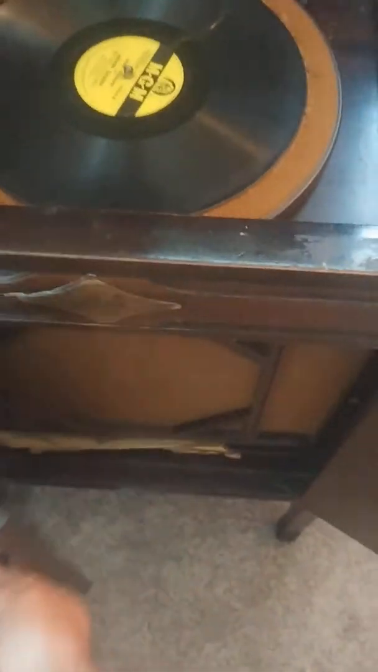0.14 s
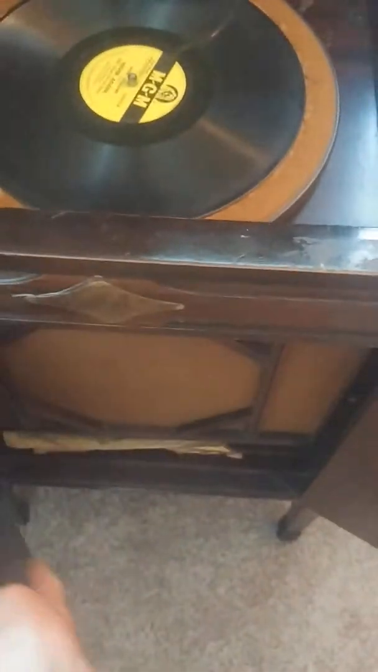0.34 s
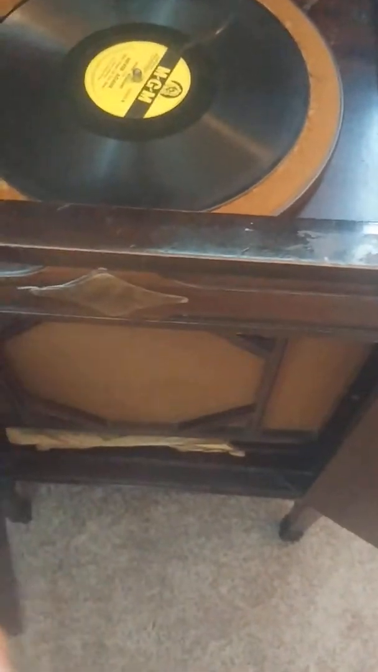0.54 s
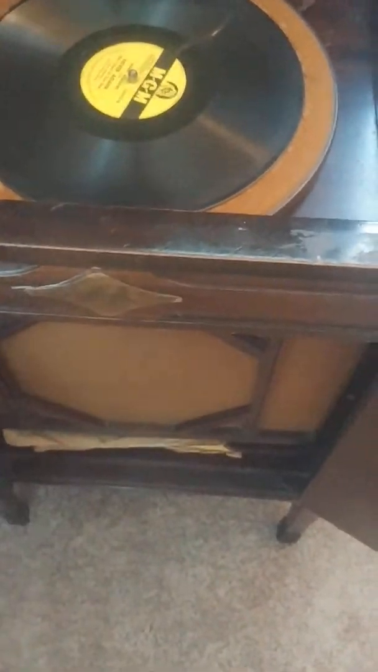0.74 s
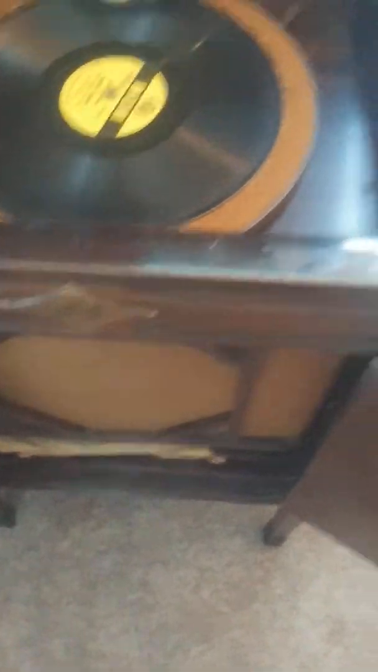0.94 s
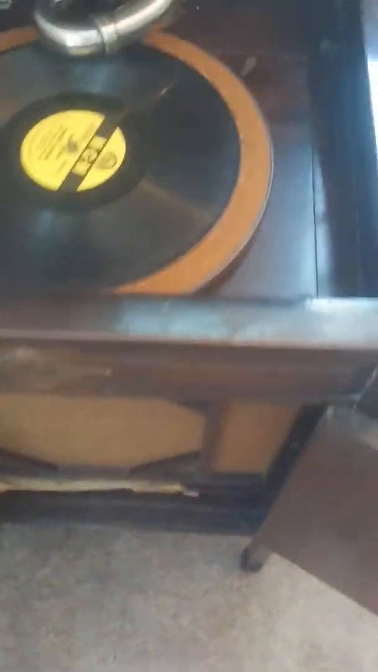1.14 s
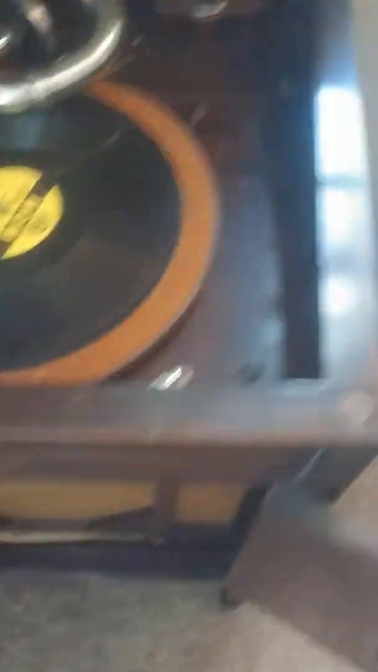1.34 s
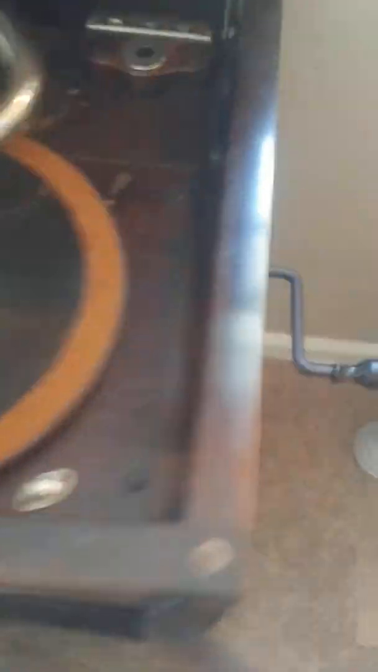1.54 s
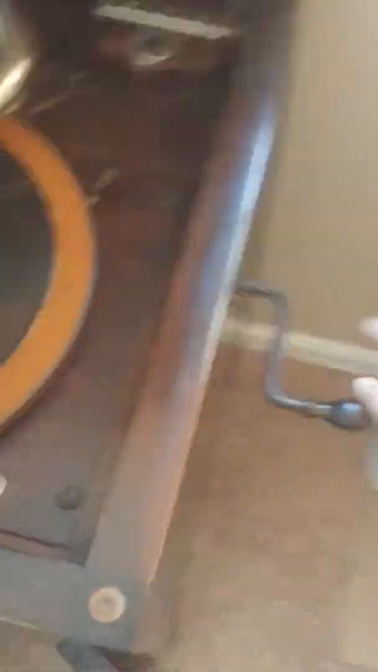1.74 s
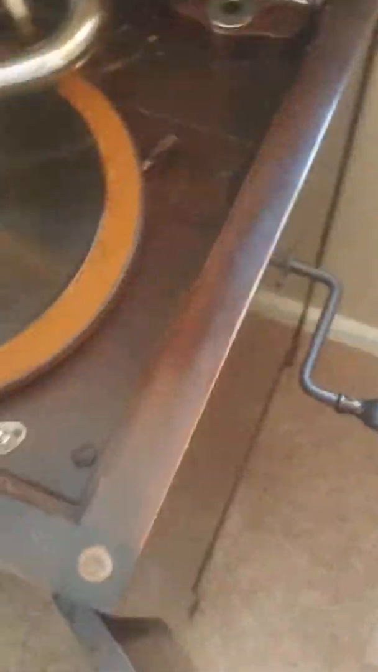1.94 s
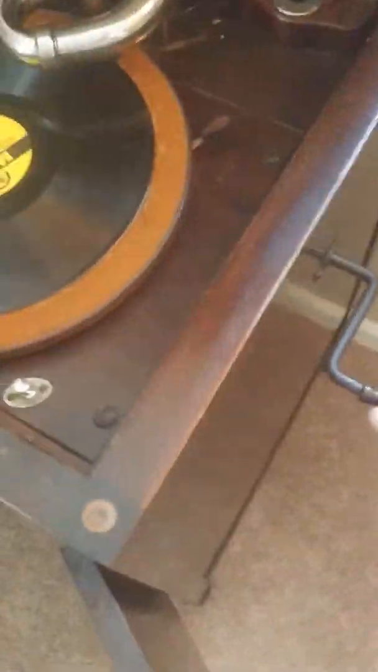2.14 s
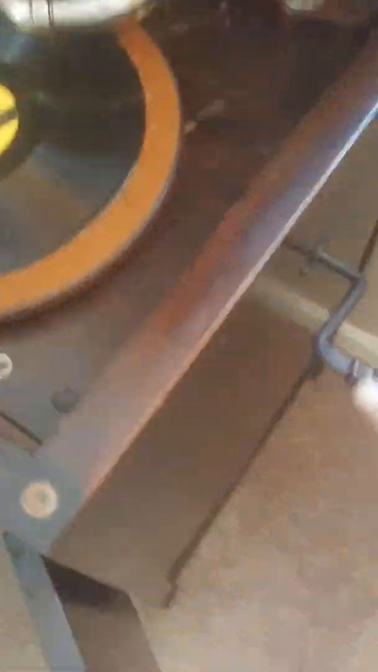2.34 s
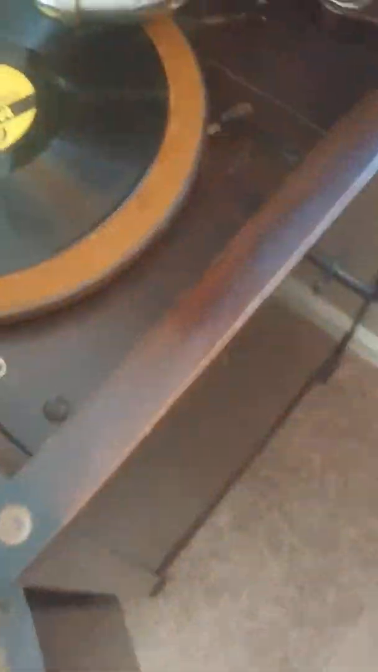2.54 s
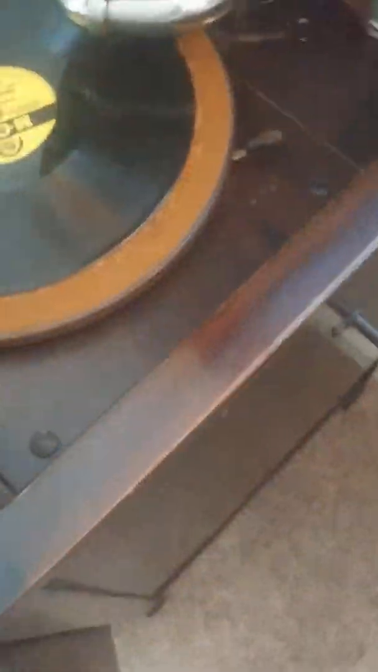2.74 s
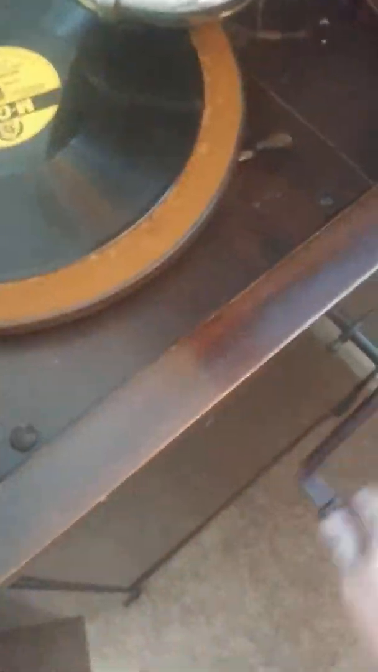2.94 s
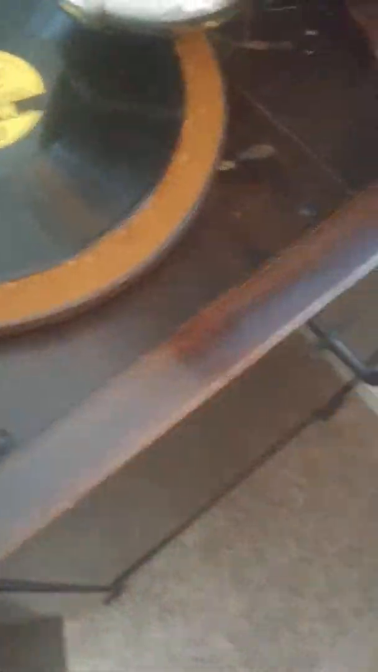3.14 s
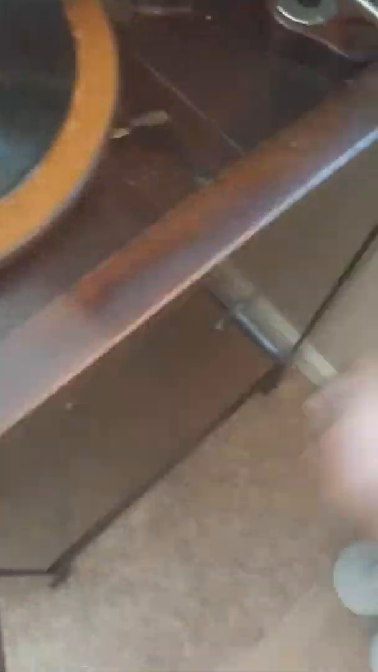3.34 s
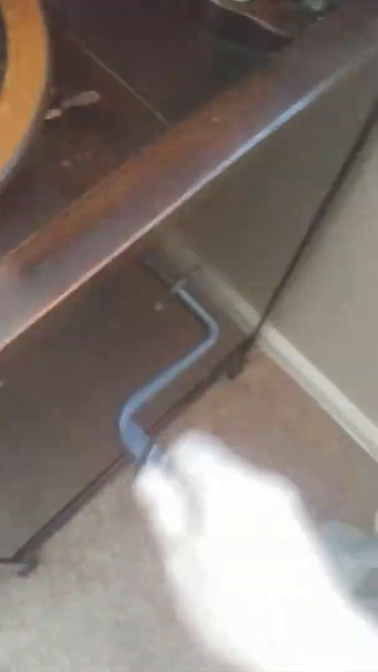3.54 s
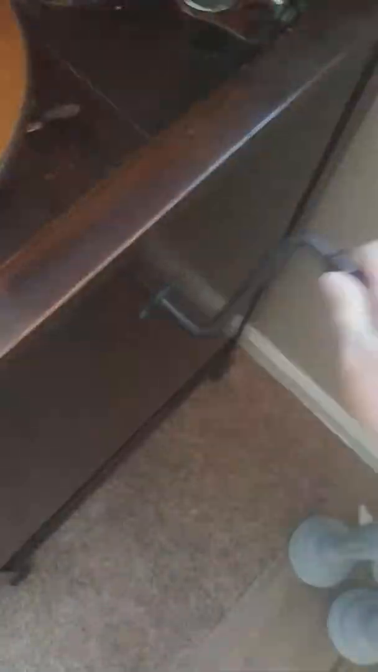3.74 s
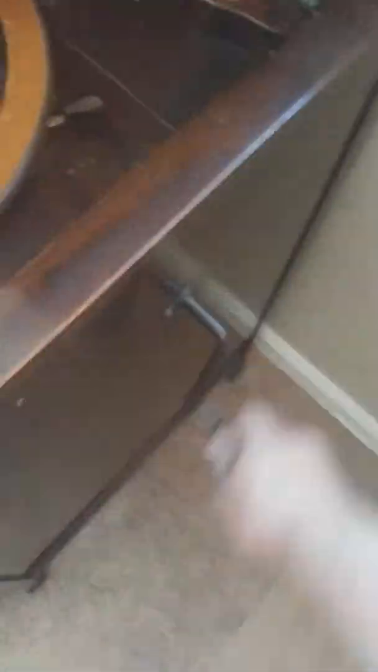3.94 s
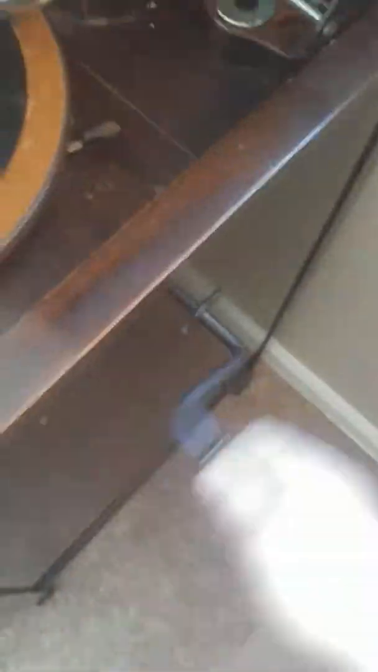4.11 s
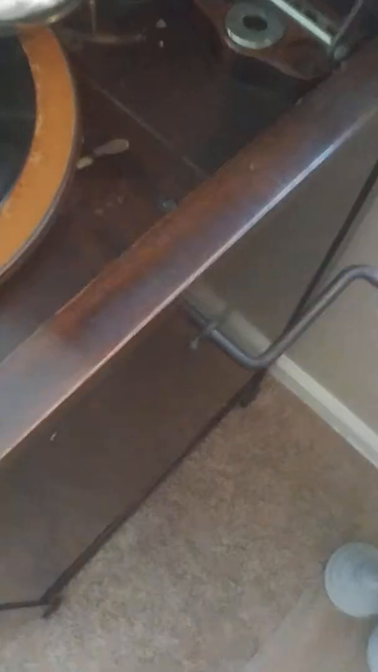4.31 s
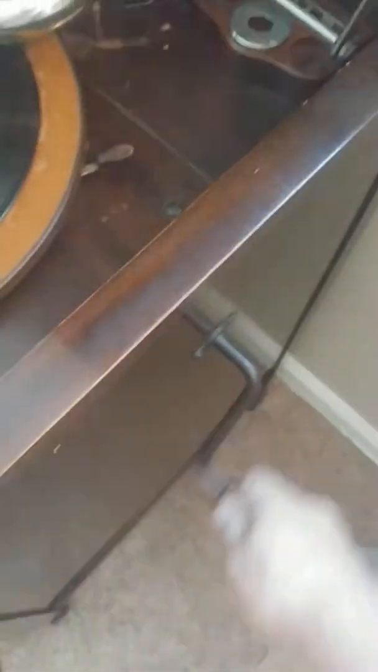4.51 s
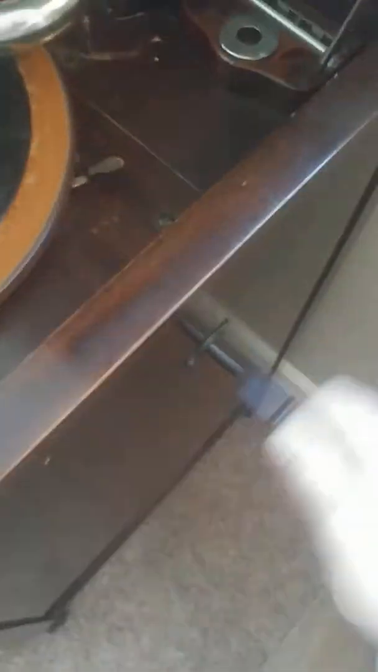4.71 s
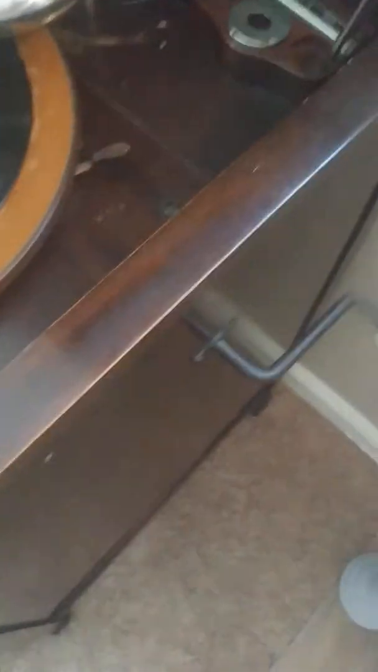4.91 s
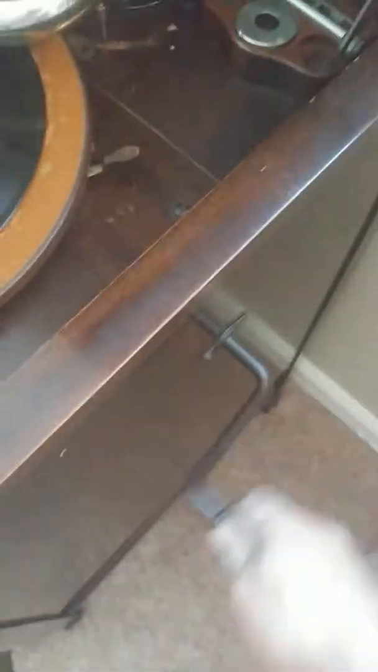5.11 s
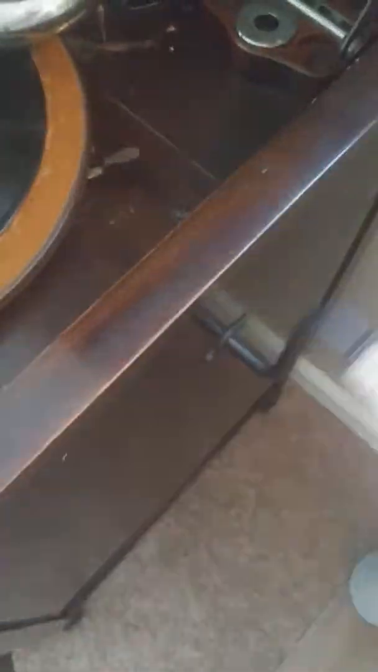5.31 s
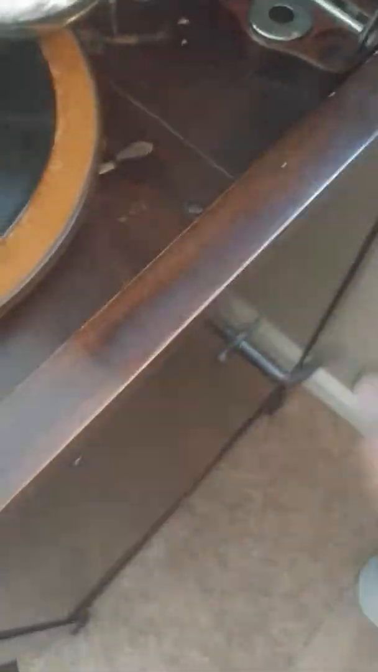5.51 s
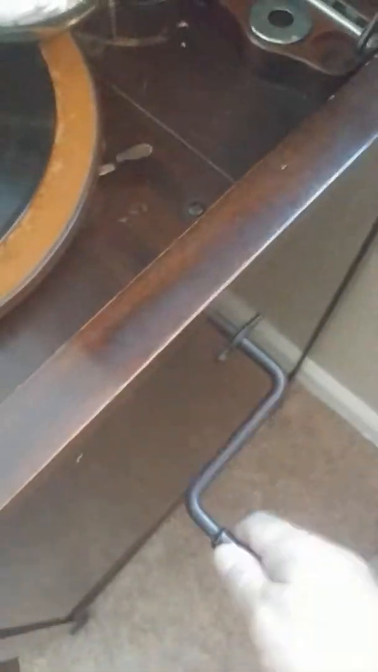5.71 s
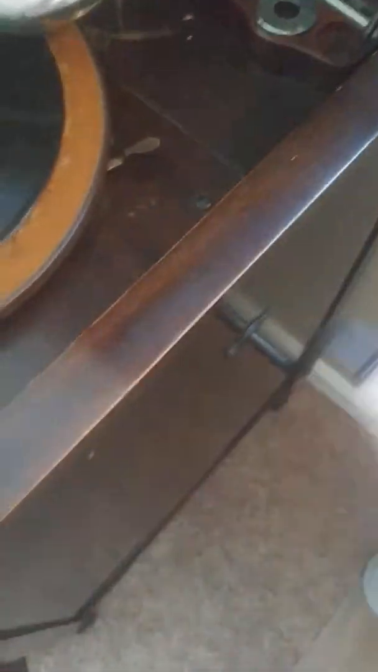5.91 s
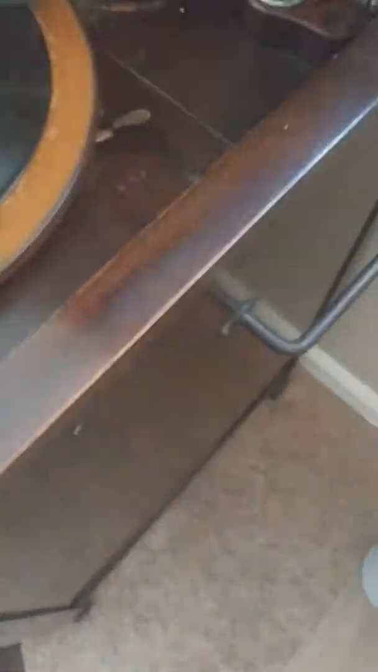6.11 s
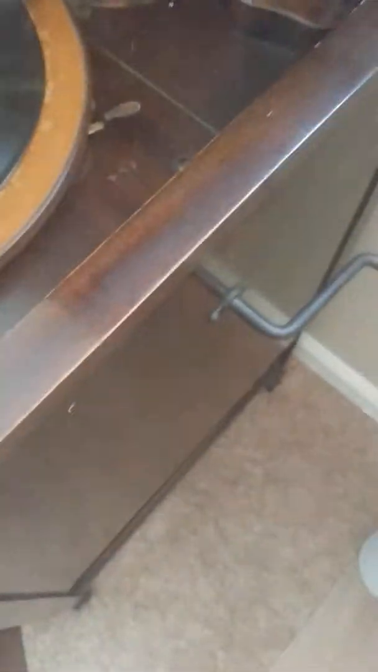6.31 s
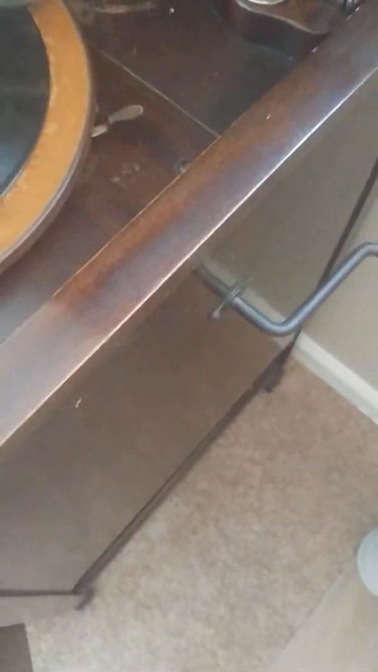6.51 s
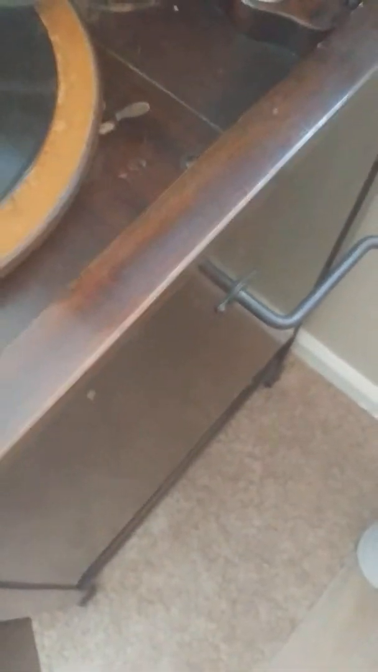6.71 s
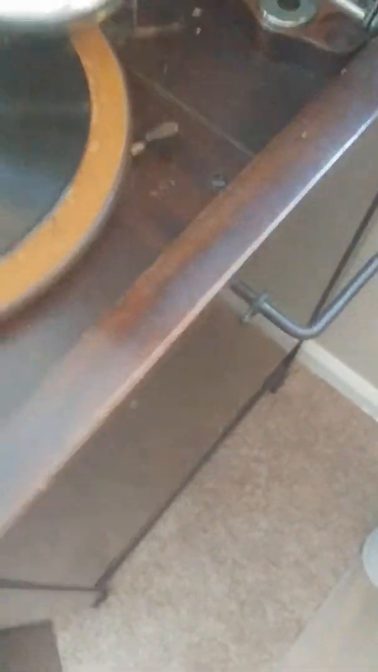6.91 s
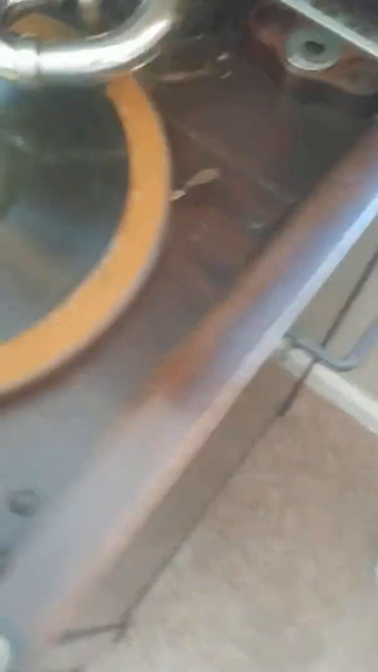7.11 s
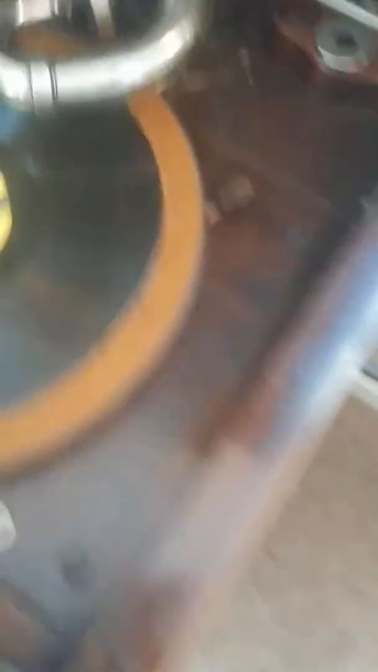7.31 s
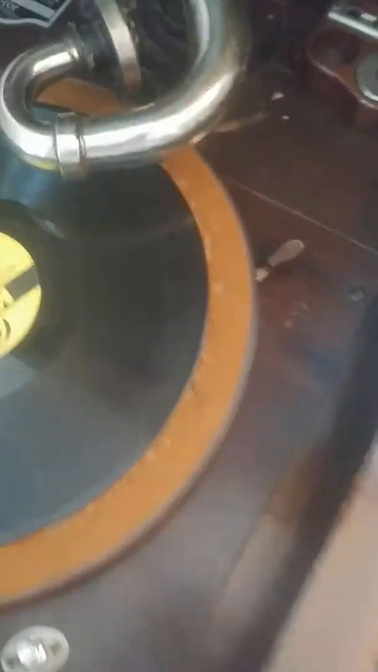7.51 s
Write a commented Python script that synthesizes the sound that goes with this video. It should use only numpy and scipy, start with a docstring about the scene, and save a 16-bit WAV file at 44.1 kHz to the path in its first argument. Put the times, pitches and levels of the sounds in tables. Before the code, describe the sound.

A carpeted room with short, soft reverberation, heard closely in stereo over faint air and a wavering low hum. At 0 s a wooden cabinet door shuts with a dull clap and rattle, leaving a thin metallic ring; a small latch click follows near 0.37 s, with a faint moan. Light cloth brushes and small taps occur around 1.0 to 1.4 s. From 1.8 s a loose crank ticks and rattles, then knocks hard at 2.06 and, loudest, 2.13 s. Winding begins about 2.5 s and runs to 6.1 s: rough, hollow gear grinding with tiny ratchet ticks, a low throb swelling about every 0.55 s, and wooden thuds and metallic clicks marking the turns. Short squeaks chirp at 4.1, 4.9, 5.4 and 6.0 s. The grinding stops; soft bumps at 6.3 to 6.6 s and a small ringing tick at 6.86 s precede quiet rustling until 7.5 s.

```python
"""A carpeted room: a wooden cabinet door shuts, a hand knocks a spring motor's crank home twice and winds it.
Uneven tooth contacts grind through the resonant cabinet panels and a low throb follows each turn, while
shaped clumps of bounces make the thuds and ticks of the loose crank. Filtered noise makes rustling clothes
and air, short unsteady tones make creaks, a moan and the ring of a tick, and a low hum wavers.
Two spaced microphones hear it all."""
import sys
import numpy as np
from scipy import signal
from scipy.fft import rfft, irfft, next_fast_len
from scipy.io import wavfile
from scipy.ndimage import uniform_filter1d

SR = 44100
rng = np.random.default_rng(int(sys.argv[2]) if len(sys.argv) > 2 else 0)


def waveform_to_disk(signal):
    """Save audio, clipped to [-1, 1], as 16-bit WAV at the path in sys.argv[1]."""
    frames = np.transpose(np.atleast_2d(signal))
    scaled = np.clip(frames, -1, 1) * 32767
    samples = np.round(scaled).astype(np.int16)
    wavfile.write(sys.argv[1], SR, samples)


N = 333041


def amp(db):
    """Decibels to gain."""
    return 10 ** (np.asarray(db) / 20)


def evened(x):
    """Scales to rms 1."""
    return x / np.sqrt(np.mean(x ** 2) + 1e-20)


def read(points, hz):
    """Reads a spectrum table on a log-frequency axis."""
    f, value = np.transpose(points)
    return np.interp(np.log(hz + 1), np.log(f + 1), value)


def curves(rows):
    """Every column of a table, drawn as straight lines over time."""
    s, *columns = np.transpose(rows)
    return [np.interp(np.arange(N) / SR, s, column) for column in columns]


def add(mix, s, sound):
    """Mixes a sound in at a time in seconds."""
    part = mix[..., round(s * SR):][..., :sound.shape[-1]]
    part += sound[..., :part.shape[-1]]


def colour(x, points, causal=False):
    """Filters by a spectrum table; a causal filter rings only after the blow."""
    size = next_fast_len(x.shape[-1] + 2048)
    gain = amp(read(points, np.fft.rfftfreq(size, 1 / SR)))
    if causal:  # minimum phase, by folding the cepstrum
        cepstrum = irfft(np.log(gain), size)
        gain = np.exp(rfft(2 * cepstrum[:size // 2], size) - cepstrum[0])
    return irfft(rfft(x, size) * gain, size)[..., :x.shape[-1]]


def resonate(x, hz, width):
    """A resonance of gain 1: shift down to zero, smooth with one pole, shift back."""
    turn = np.exp(2j * np.pi * np.cumsum(hz * np.ones(len(x))) / SR)
    r = np.exp(-np.pi * width / SR)
    return 2 * (turn * signal.lfilter([1 - r], [1, -r], x / turn)).real


def drift(samples):
    """Slow random motion of rms 1."""
    return evened(uniform_filter1d(uniform_filter1d(rng.standard_normal(N), samples), samples))


def swell(start, end, edge):
    """A window that rises, holds and falls."""
    t = np.arange(N) / SR
    return np.clip(np.minimum(t - start, end - t) / edge, 0, 1)


def dying(events, rise_s, t60):
    """Envelope of events (s, dB) that rise, then die away."""
    t, out = np.arange(SR) / SR, np.zeros(N)
    for s, db in events:
        add(out, s, np.minimum(t / rise_s, 1) * amp(db - 60 * np.maximum(t - rise_s, 0) / t60))
    return out


def band(hz, width):
    """Two unrelated channels of narrow noise."""
    return evened(np.array([resonate(resonate(x, hz, width), hz, width)
                            for x in rng.standard_normal((2, N))]))


# Likeness of the hiss at the two microphones. Each row: frequency in Hz, left-right correlation.
HISS_LIKENESS = [(60, 0.5), (130, 0.43), (290, 0.55), (640, 0.78), (1500, 0), (3000, 0.0067), (15000, 0)]


def hiss(points, patchy_db):
    """Two partly alike channels of noise with drifting patches in time and frequency."""
    frames, hz = N // 128 + 9, np.fft.rfftfreq(512, 1 / SR)
    a, b, c, d, patches = rng.standard_normal((frames, 257, 5)).T
    patches = evened(uniform_filter1d(uniform_filter1d(patches, 8, 0), 16, 1))
    same = np.clip(read(HISS_LIKENESS, hz), -1, 1)[:, None]
    left = a + 1j * b
    right = same * left + np.sqrt(1 - same ** 2) * (c + 1j * d)
    z = np.array([left, right]) * amp(read(points, hz)[:, None] + patchy_db * patches)
    return evened(signal.istft(z, nperseg=512, noverlap=384)[1][:, :N])


# Decay of the carpeted room. Each row: frequency in Hz, time to fall 60 dB in seconds.
ROOM_DECAY = [(100, 0.19), (500, 0.36), (2000, 0.39), (7000, 0.34), (14000, 0.2)]


def room(x):
    """Sparse taps of random sign, each band dying at its own speed, other taps per channel."""
    taps = np.zeros((2, SR // 2))
    at = np.arange(200, SR // 2 - 20, 20) + rng.integers(0, 20, (2, (SR // 2 - 201) // 20))
    np.put_along_axis(taps, at, rng.choice([-1., 1.], at.shape), 1)
    hz, t, z = signal.stft(taps, SR, nperseg=256)
    fall = amp(-60 * t / np.maximum(read(ROOM_DECAY, hz), .05)[:, None])
    tail = signal.istft(z * fall, SR, nperseg=256)[1]
    return signal.fftconvolve(x[None], tail / np.linalg.norm(tail[0]), axes=1)[:, :N]


# Colour of the room air. Each row: frequency in Hz, relative level in dB.
AIR_COLOUR = [(41, -40.5), (70, 8.5), (186, -51.5), (541, -13), (853, -37), (1370, -69.5), (5370, -53),
              (6900, -41), (8860, -44), (12200, -23.5), (16000, -53.5)]
AIR_DB = -68
# A faint narrow band of hiss: centre in Hz, width in Hz, level in dB.
AIR_WHINE = (12400, 280, -73.5)
# A thin hiss that comes and goes. Each row: start and end in seconds, centre in Hz, level in dB.
THIN_HISSES = [(4.96, 5.141, 6460, -72.5), (5.368, 5.56, 6500, -74), (5.58, 5.72, 6460, -70.5),
               (7.377, 7.497, 6430, -76)]


def air():
    """Broad noise for the room air, with a faint whine and a thin hiss of narrow noise."""
    hz, width, whine_db = AIR_WHINE
    whine = amp(whine_db) * swell(1.07, 7.0, 0.18) * band(hz, width)
    thin = sum(amp(db) * swell(a, b, 0.047) * band(f, 500) for a, b, f, db in THIN_HISSES)
    return amp(AIR_DB) * hiss(AIR_COLOUR, patchy_db=-1.5) + whine + thin


HUM_HZ = 57.3  # centre of its wavering pitch
# Level of the low hum before its waver. Each row: time in seconds, level in dB.
HUM_LEVEL = [(0, -63), (.12, -52), (.82, -65), (.97, -51), (1.14, -55), (3.5, -52.5), (5.9, -64),
             (6.08, -51), (6.27, -57.5), (6.52, -45), (6.67, -58.5), (7.55, -57.5)]
# Colour of the soft low rumble. Each row: frequency in Hz, relative level in dB.
RUMBLE_COLOUR = [(15, -32), (30, -9.5), (45, -0.5), (60, 8.5), (85, -5), (110, -52)]
RUMBLE_DB = -60.5


def hum():
    """A low sine that wavers in pitch and level, over a soft rumble of low noise."""
    tone = np.sin(2 * np.pi * np.cumsum(HUM_HZ + 1.81 * drift(samples=4000)) / SR)
    tone *= np.sqrt(2) * amp(curves(HUM_LEVEL)[0] + 2.8 * drift(samples=2500))
    noise = rng.standard_normal((2, N)) + 6 * rng.standard_normal(N)  # mostly shared by both channels
    return tone + amp(RUMBLE_DB) * evened(colour(noise, RUMBLE_COLOUR))


# Colour of rubbing cloth. Each row: frequency in Hz, relative level in dB.
CLOTH_COLOUR = [(150, -16), (400, 1.5), (800, 7.5), (1500, 0), (3000, 0), (6000, -3), (10000, -7.5),
                (16000, -5)]
# Colour of the low body of a brush. Each row: frequency in Hz, relative level in dB.
BRUSH_BODY_COLOUR = [(200, -51), (450, 27), (900, 20), (1500, -27), (2500, -25)]
# Steady rustle of cloth and hands. Each row: time in seconds, level in dB.
RUSTLE_LEVEL = [(0, -29.5), (.04, -85), (.14, -60), (.2, -69), (.73, -75.5), (1.2, -66.5), (1.62, -70.5),
                (2.33, -64), (2.8, -67.5), (4.75, -67), (5.55, -63.5), (5.8, -70.5), (7.05, -74),
                (7.35, -66), (7.55, -62.5)]
# Single brushes of cloth or feet. Each row: start and end in seconds, level in dB, low body in dB
# against the level.
CLOTH_BRUSHES = [(0.374, 0.53, -65, -5), (0.584, 0.77, -70.5, -1), (0.952, 1.086, -60, 1.5),
                 (1.028, 1.394, -77.5, 13), (1.175, 1.224, -54, -8), (1.321, 1.415, -60, -0.5),
                 (1.547, 1.603, -64, -7), (1.814, 1.874, -64, 16), (3.02, 3.198, -65.5, 18),
                 (5.938, 6.077, -68, -15), (7.084, 7.339, -55, -8.5), (7.275, 7.325, -64, -28),
                 (7.33, 7.561, -72, 6.5)]


def cloth():
    """Patchy noise as fibres rub: a steady rustle with single brushes over it."""
    top, body, steady = hiss(CLOTH_COLOUR, 1.4), hiss(BRUSH_BODY_COLOUR, 1.5), hiss(CLOTH_COLOUR, 1.5)
    uneven = amp(1.5 * drift(samples=500))
    brushes = sum(amp(db) * swell(a, b, 0.031) * uneven * (top + amp(body_db) * body)
                  for a, b, db, body_db in CLOTH_BRUSHES)
    return amp(curves(RUSTLE_LEVEL)[0]) * steady + brushes


# Rings after door and latch, before their waver. Each row: start in seconds, pitch in Hz, level in dB,
# time to fall 60 dB in seconds.
DOOR_RINGS = [(0, 2860, -64, 1), (.37, 2850, -74, 1.1), (.37, 3200, -78, .9)]
WAVER_DB, WAVER_HZ = 4, 5  # rms


def door_metal():
    """Thin metal rings on a little unevenly after the door shuts: decaying, wavering sines."""
    t, out = np.arange(N) / SR, np.zeros(N)
    for s, hz, db, t60 in DOOR_RINGS:
        level = amp(db - 60 * np.maximum(t - s, 0) / t60 + WAVER_DB * drift(samples=1500))
        tone = np.sin(2 * np.pi * np.cumsum(hz + WAVER_HZ * drift(samples=2000)) / SR)
        out += (t > s) * level * tone
    return out


# Creaks and a moan, and last the short high ring of a tick. Each row: start and length in seconds,
# pitch from and to in Hz, mean level in dB.
UNSTEADY_TONES = [(0.44, 0.46, 554, 536, -61), (0.616, 0.18, 293, 285, -59), (4.11, 0.038, 850, 810, -44),
                  (4.872, 0.051, 872, 746, -41), (5.422, 0.032, 792, 810, -42.5),
                  (5.63, 0.032, 1013, 1016, -47), (6.02, 0.046, 936, 830, -41.5),
                  (6.073, 0.05, 817, 790, -47), (6.133, 0.09, 690, 636, -53.5),
                  (6.855, 0.026, 2630, 2630, -56.5)]
UNEVEN_DB = 3.5  # rms


def creaks():
    """Creaks and a moan, and last the short high ring of a tick: sines unsteady in pitch and level."""
    out = np.zeros(N)
    for s, length, from_hz, to_hz, db in UNSTEADY_TONES:
        hz = np.linspace(from_hz, to_hz, round(length * SR))
        jitter = 1 + 0.21 * uniform_filter1d(rng.standard_normal(len(hz)), 100)
        uneven = evened(uniform_filter1d(rng.standard_normal(len(hz)), size=300))
        tone = np.sin(2 * np.pi * np.cumsum(hz * jitter) / SR)
        add(out, s, np.sqrt(2) * amp(db + UNEVEN_DB * uneven) * tone * np.hanning(len(hz)))
    return out


def rattle(t60, clicks_per_s, spread_db, first_db):
    """A first contact, then a clump of small uneven bounces that holds briefly and stops."""
    t, (when, size, sign) = np.arange(8000) / SR, rng.random((3, 8000))
    bounces = (when < clicks_per_s / SR) * amp(spread_db * np.log(size + 1e-3)) * np.sign(sign - .5)
    bounces[0] = amp(first_db)
    return bounces * amp(-60 * (t / max(t60, .003)) ** 1.71)


# Modes of crank and ratchet. Each row: pitch in Hz, relative level in dB, time to fall 60 dB in seconds.
CRANK_MODES = [(2060, -6, 0.068), (2674, -13, 0.038), (3370, -1, 0.027), (3750, -11.5, 0.019),
               (4410, 1, 0.029), (4880, -1, 0.028)]
METAL_DB, METAL_FALL_DB = -29.5, 14  # gain on the modes; loss per octave away from the ring of the tick


def metal(clicks, ring_hz):
    """Clicks ring the crank's modes, most of all those near the ring of the tick."""
    hz, db, t60 = np.transpose(CRANK_MODES)[:, :, None]
    t = np.arange(2000) / SR
    level_db = db - METAL_FALL_DB * abs(np.log2(hz / ring_hz))
    modes = amp(level_db - 60 * t / t60) * np.sin(2 * np.pi * hz * t)
    return amp(METAL_DB) * signal.oaconvolve(clicks, modes.sum(0))[:len(clicks)]


# Bright ticks, with a short burst of clicks just before the loudest one. Each row: start in seconds,
# dry peak before panning in dB, ring in Hz, time for the rattle to fall 60 dB in seconds,
# left-right difference in dB.
BRIGHT_TICKS = [(0.0034, -21.5, 6770, 0.14, 2), (.004, -33.5, 4230, 0.3, 3.5), (0.365, -33, 7200, 0.024, 0),
                (0.87, -58.5, 10200, 0.01, 24), (1.155, -55, 10300, 0.032, 10),
                (1.189, -46.5, 7160, 0.012, -15), (1.256, -48, 5500, 0.013, -1),
                (1.8255, -40, 2380, 0.093, -2), (1.8585, -30.5, 2850, 0.034, -15),
                (2.0532, -22, 2980, 0.044, 2), (2.103, -35, 6200, 0.03, -4), (2.12, -23.5, 4500, 0.055, 0),
                (2.1242, -12.5, 10800, 0.019, 1.5), (2.1256, -23, 5900, 0.039, 0),
                (2.14, -45.5, 7160, 0.47, -0.5), (2.439, -43.5, 10200, 0.013, -3),
                (2.165, -37.5, 10550, 0.028, 6.5), (2.46, -56, 10000, 0.011, 6),
                (2.813, -41, 2580, 0.024, -12.5), (2.819, -45, 2550, 0.053, -9),
                (3.091, -54.5, 4730, 0.028, 4.5), (3.223, -56, 4700, 0.085, 1),
                (3.262, -56, 4570, 0.092, -3), (3.308, -53, 2740, 0.068, -1),
                (3.3524, -49, 2500, 0.093, -1.5), (3.3962, -37.5, 2540, 0.052, -7),
                (3.523, -51, 2580, 0.03, -2), (3.719, -58, 10100, 0.022, 22), (3.892, -44, 2440, 0.16, -2),
                (3.936, -38.5, 3170, 0.044, -2), (4.1413, -50.5, 4480, 0.029, -5),
                (4.345, -48, 5040, 0.06, -9.5), (4.3646, -45, 2556, 0.05, 2),
                (4.461, -35.5, 7800, 0.061, -6), (4.472, -38, 2550, 0.053, 6.5),
                (4.587, -47.5, 2770, 0.058, 1), (4.615, -49, 3210, 0.018, -4),
                (4.647, -51.5, 2700, 0.049, -7), (4.804, -43.5, 4930, 0.027, -21.5),
                (4.807, -39.5, 2400, 0.081, -6), (4.838, -47, 4300, .02, 2), (4.885, -49, 2630, 0.026, 0.0),
                (4.999, -53, 9900, 0.038, 13), (5.027, -36.5, 2250, 0.041, -3),
                (5.1116, -52.5, 4286, 0.033, -5), (5.253, -55, 2650, 0.028, -4.5),
                (5.5641, -24, 2096, 0.047, 0), (5.62, -49.5, 4200, 0.045, 0),
                (6.058, -54.5, 10030, 0.014, 16), (5.933, -58, 2400, 0.025, 9),
                (5.975, -56, 2400, 0.023, 3), (6.021, -59, 2500, 0.035, 4), (6.187, -58.5, 2070, 0.033, 6),
                (6.2746, -56.5, 10000, 0.014, 20), (6.3, -55.5, 10100, 0.024, 19),
                (6.4667, -38.5, 6540, 0.039, -3.5), (6.561, -44, 1900, 0.057, -4),
                (6.856, -48.5, 2665, 0.051, -3), (7.292, -52, 6980, 0.056, -8)]
# Colour of the broad clicks. Each row: frequency in Hz, relative level in dB.
CLICK_COLOUR = [(500, -27), (1500, -32), (2500, -1), (5000, 3), (8000, -4.5), (12000, 4), (16000, -22)]
RIGHT_LAG = 18  # samples: the cabinet is nearer the left microphone


def ticks():
    """Clumps of broad clicks around one ringing pitch; a low ring gives duller clicks."""
    out = np.zeros((2, N))
    for s, db, hz, t60, pan_db in BRIGHT_TICKS:
        shared = rattle(t60, 6000, 8.0, 3.64)
        dull = [(0.32 * hz, -6), (hz, 0), (1.9 * hz, -5), (3.0 * hz, -16)]
        heard = []
        for _ in range(2):  # each microphone hears its own mix of bounces
            clicks = shared + 3.03 * rattle(t60, 6000, 0.7, 1.0)
            broad = colour(colour(clicks, CLICK_COLOUR), dull)
            heard.append(broad + 1.7 * resonate(clicks, hz, 1100) + metal(clicks, hz))
        left, right = heard
        tick = np.array([left * amp(pan_db / 2), np.roll(right, RIGHT_LAG) * amp(-pan_db / 2)])
        add(out, s, amp(db) * tick / abs(left).max())
    return out


# Dense small modes of the frame. Each row: frequency in Hz, relative level in dB.
FRAME_COLOUR = [(150, -27), (350, 5.5), (600, 3), (1200, 9.5), (2000, 4), (3500, -4), (8000, -42.5)]
# Phase between the microphones. Each row: frequency in Hz, radians by which the left one leads.
LEFT_LEAD = [(100, .1), (250, 0.1), (400, 0.16), (520, 0.87), (700, 2.8), (890, 3.1), (980, 6.6),
             (1200, 7.3), (1390, 9), (1540, 11.7), (1730, 14), (1900, 14.6), (2100, 19.2)]
WOOD_KNOCK_T60_S, WOOD_TAIL_DB, WOOD_TAIL_T60_S = 0.072, -17, 0.15
WOOD_APART = 0.25  # noise of each side's own, against the shared noise


def woodwork(t):
    """Frame, shelves and joints: too many small modes to tell apart, a short dense knock and a softer tail."""
    f = np.fft.rfftfreq(len(t), 1 / SR)
    shared, left, right = rng.standard_normal((3, len(t)))
    fall = amp(-60 * t / WOOD_KNOCK_T60_S) + amp(WOOD_TAIL_DB - 60 * t / WOOD_TAIL_T60_S)
    heard = []
    for own, side in ((left, .5), (right, -.5)):
        response = amp(read(FRAME_COLOUR, f)) * np.exp(1j * side * read(LEFT_LEAD, f))
        heard.append(irfft(rfft(shared + WOOD_APART * own) * response, len(t)))
    return fall * np.array(heard)


# Cabinet panels. Each row: centre pitch in Hz, relative level in dB, time to fall 60 dB in seconds.
PANEL_MODES = [(74, -6.5, 0.42), (108, -7.5, 0.13), (150, -17, 0.12), (267.4, -3.5, 0.1),
               (290, -0.5, 0.064), (304.6, -1.5, 0.067), (333.6, -8, 0.12), (374, -6.5, 0.041),
               (459.3, -3, 0.1), (504, -3, 0.13), (546, -2.5, 0.088), (614, 1.5, 0.06), (701.6, 2.5, 0.095),
               (789, 1.5, 0.058), (870.6, -3, 0.053), (928.6, -2, 0.043), (996, -1, 0.037),
               (1032, -2.5, 0.029), (1125, -16.5, 0.096), (1220, -10, 0.029), (1378, 0, 0.019),
               (1450, -3, 0.017), (1624, 0.5, 0.012), (1665, -8, 0.042), (1680, -17, 0.039),
               (1770, -29.5, 0.006), (1980, -2, 0.02), (2103, -4, 0.021), (2200, -11, 0.0085),
               (2256, -17, 0.048), (2360, -17, 0.017), (2630, -3, 0.018)]
# Balance of the panel modes. Each row: frequency in Hz, left-right difference in dB.
PANEL_BALANCE = [(300, 0), (480, -1), (620, -0.5), (850, 10.5), (1200, 6.5), (2000, 2.5)]
# each spot struck shifts the modes (full spread, as a share) and their left-right phase (rms radians)
DETUNE, SCATTER = 0.028, 0.99


def cabinet(force):
    """The panels ring as decaying modes; on the whole the left microphone leads the right in phase."""
    hz, db, t60 = np.transpose(PANEL_MODES)[:, :, None]
    t = np.arange(10000) / SR
    # half a turn between neighbours, then a random shift
    start = np.pi * np.arange(len(hz))[:, None] + 2.87 * rng.random(hz.shape)
    hz = hz * (1 + DETUNE * (rng.random(hz.shape) - .5))
    lead = read(LEFT_LEAD, hz) + SCATTER * np.minimum(hz / 500, 1) * rng.standard_normal(hz.shape)
    heard = [(amp(db + side * read(PANEL_BALANCE, hz)) * np.exp(1j * (start + side * lead)))[:, 0]
             for side in (.5, -.5)]
    rings = (np.array(heard) @ np.exp((2j * np.pi * hz - np.log(1000) / t60) * t)).imag
    response = (rings + woodwork(t)) * np.minimum(t / 0.00093, 1)
    return signal.oaconvolve(force[None], response, axes=1)[:, :N]


# Blows into the wood. Each row: start in seconds, dry peak in dB, hardness in dB, time for the rattle to
# fall 60 dB in seconds, pitch of the spot struck in Hz, bass weight in dB, relative knock near 1 kHz in dB.
WOOD_THUDS = [(0.006, -23, -47, 0.13, 400, -22, -6.5), (0.364, -35.5, -26, 0.05, 413, 5, -7),
              (1.022, -32, -13, 0.19, 653, -19, 7), (1.158, -41.5, -20, 0.043, 650, -23, 1),
              (1.839, -31.5, -33, 0.1, 516, -32, -8.5), (1.862, -28, -11.5, 0.041, 546, -28, -6),
              (1.981, -36, -40, 0.062, 504, -59, -19), (2.037, -30.5, -11.5, 1, 510, -13, -15),
              (2.056, -15.5, -19.5, 0.045, 515, -23, -4.5), (2.104, -22, -27, 0.045, 510, -28.5, -7),
              (2.125, -3.5, -9, 0.025, 511, -48, 3.5), (2.138, -13, -37.5, 0.059, 528, -28, -10.5),
              (2.821, -20.5, -11.5, 0.023, 564, 3, -15.5), (2.981, -24.5, -50, 0.061, 282, -19, -8),
              (3.297, -29.5, -8, 0.036, 477, -21, 4), (3.401, -19.5, -13, 0.017, 516, -35, -7.5),
              (3.522, -19, -23.5, 0.058, 400, -20, -7.5), (3.803, -30, -42, 0.13, 480, -1, -13),
              (3.941, -23.5, -22.5, 0.041, 486, -27, -7), (4.06, -18, -24.5, 0.029, 304, -22, -1),
              (4.344, -20, -28, 0.018, 790, -34, -1), (4.361, -31.5, -12, 0.027, 510, -28, -7),
              (4.475, -19, -25, 0.035, 596, -18, -3), (4.589, -15.5, -25, 0.055, 322, -2, -4),
              (4.653, -32, -33, 0.039, 510, -9, -19), (4.807, -29.5, -23.5, 0.018, 580, -18, -16.5),
              (4.828, -33, -30, 0.025, 499, -20, -30), (4.885, -42, -19, 0.014, 816, -15, 2),
              (5.03, -25.5, -8.5, 0.029, 453, -11, -2.5), (5.167, -19, -24.5, 0.037, 268, 2.5, -2),
              (5.565, -19, -29, 0.027, 510, -26, -14), (5.687, -27, -28.5, 0.036, 283, -18, -6),
              (5.969, -32, -49, 0.32, 255.2, -21, -47), (6.313, -38, -47, 0.17, 266, 6, -10),
              (6.453, -28, -58, 0.056, 255, 3.5, -12), (6.466, -33.5, -16, 0.083, 274, -19, -5),
              (6.559, -23, -13, 0.05, 805, -39.5, -2.5), (6.794, -44.5, -49.5, 0.05, 290, -20, -27),
              (6.859, -46.5, -12, 0.092, 280, -10, -10.5)]


def thuds():
    """A harder blow wakes higher modes; the spot struck favours the modes near its pitch."""
    out = np.zeros((2, N))
    for s, db, hard_db, t60, hz, bass_db, knock_db in WOOD_THUDS:
        shape = [(150, bass_db), (240, 0.018), (620, 0.0082),
                 (800, knock_db + 6.0), (1030, knock_db + 9.0), (1400, knock_db + 8.5),
                 (1900, hard_db + 19), (6000, hard_db), (12000, hard_db - 12)]
        blow = colour(rattle(t60, 1500, 5.8, 12.8), shape, causal=True)
        blow += 3.33 * resonate(blow, hz, 84)
        ring = cabinet(blow)[:, :14000]
        add(out, s, amp(db) * ring / abs(ring).max())
    return out


# teeth that catch and press harder for a moment; the level is scaled at random for each catch
CATCHES_PER_S, CATCH_DB, CATCH_T60_S = 80, -4, .02


def teeth(points):
    """Uneven tooth contacts at three spots, pressing in lumps, ringing through the cabinet and the room."""
    size_db = 2.9 * np.minimum(rng.exponential(1, N), 4) + 1.5 * drift(samples=700)
    size = amp(size_db) * rng.choice([-1, 1], N)
    catches = (rng.random(N) < CATCHES_PER_S / SR) * amp(CATCH_DB) * rng.exponential(1, N)
    fall = amp(-60 * np.arange(3000) / SR / CATCH_T60_S)
    size = size * (1 + signal.oaconvolve(catches, fall)[:N])
    contacts = (rng.random(N) < 2600 / SR) * size  # 2600 contacts per second on average
    spot = rng.integers(0, 3, N)
    direct = colour(sum(cabinet(contacts * (spot == k)) for k in range(3)), points)
    return evened(direct + amp(-16.0) * room(direct[0]))


# Colour of the ratchet chatter. Each row: frequency in Hz, relative level in dB.
CHATTER_COLOUR = [(1000, -3), (1500, 14), (2500, -4.5), (4500, -3), (6500, -8.5), (9000, -22)]
CHATTER_PER_S, CHATTER_SPREAD_DB, CHATTER_T60_S = 130, 2.4, .045


def chatter():
    """Tiny uneven ticks of the ratchet: short dying bursts of noise, in three sets with noise of their own."""
    size = amp(CHATTER_SPREAD_DB * np.minimum(rng.exponential(1, N), 4))
    when = (rng.random(N) < CHATTER_PER_S / SR) * size
    part, out = rng.integers(0, 3, N), np.zeros((2, N))
    fall = amp(-60 * np.arange(2000) / SR / CHATTER_T60_S)
    for k in range(3):
        envelope = signal.oaconvolve(when * (part == k), fall)[:N]
        out += envelope * rng.standard_normal((2, N))
    return evened(colour(out, CHATTER_COLOUR))


# Crank turns, each from the top thud to the next. Each row: start in seconds, mean throb pitch in Hz,
# throb peak in dB before its waver, share of the turn at which it peaks (0-1), push in dB.
CRANK_TURNS = [(2.44, 71.8, -70, 0.5, -61), (2.982, 72.2, -38, 0.33, -43), (3.523, 71.8, -37, 0.32, -40.5),
               (4.058, 74, -38, 0.3, -36.5), (4.587, 74, -38, 0.2, -33.5), (5.166, 74.8, -36, 0.18, -37),
               (5.69, 73.6, -38.5, 0, -56)]
LAST_TURN_END_S = 6.2
# the throb swells on the downstroke, dips, returns weaker on the upstroke and dies:
# shares of the turn, and dB against the peak
THROB_START_DB, THROB_DIP, THROB_DIP_DB = -9.5, 0.6, -21
THROB_BACK, THROB_BACK_DB, THROB_END, THROB_END_DB = .61, -4.5, .92, -18.5


def throb():
    """The gear mesh throbs low under load: a wavering tone and its octave, by one rule for every turn."""
    starts, rows = [row[0] for row in CRANK_TURNS] + [LAST_TURN_END_S], []
    for (s, hz, db, peak, _), end in zip(CRANK_TURNS, starts[1:]):
        shape = [(0, THROB_START_DB), (peak, 0), (THROB_DIP, THROB_DIP_DB),
                 (THROB_BACK, THROB_BACK_DB), (THROB_END, THROB_END_DB)]
        rows += [(s + share * (end - s), hz, db + rel_db) for share, rel_db in shape]
    hz, db = curves(rows)
    phase = 2 * np.pi * np.cumsum(hz + 1.43 * drift(samples=3000)) / SR
    tone = np.sin(phase) + 0.13 * np.sin(2 * phase + 0.7)
    level = np.sqrt(2) * amp(db + 2.9 * drift(samples=1500))
    return level * tone * swell(starts[0], LAST_TURN_END_S, 0.055)


# Murmur in the panels, from the swinging door and the hand, then from the gears; the stroke adds to it.
# Each row: time in seconds, grind in dB, its upper part in dB, boom in dB.
PANEL_MURMUR = [(0, -54, -44.5, -47), (.17, -55.5, -55.5, -44), (0.261, -70, -72, -63),
                (0.621, -60.5, -66, -62), (.86, -67, -72.5, -66), (1.2, -70, -70, -64),
                (1.6, -77, -73, -65), (1.9, -59.5, -59, -56), (2.33, -62.5, -63.5, -58.5),
                (2.53, -52.5, -58.5, -45.5), (2.62, -39, -49, -55), (2.9, -46.5, -50.5, -47),
                (3.3, -39.5, -45, -46), (5.55, -41.5, -47, -44.5), (5.94, -46.5, -54.5, -52.5),
                (5.99, -43.5, -56, -46), (6.1, -48, -56.5, -51), (6.27, -62, -69.5, -48),
                (6.42, -60, -66.5, -44), (6.85, -64.5, -65.5, -58.5), (7.0, -75, -79.5, -73.5),
                (7.34, -67, -74, -59), (7.55, -62.5, -93, -58.5)]
# Offsets within one turn. Each row: share of the turn (0-1), grind in dB, its upper part in dB, boom in dB.
TURN_STROKE = [(0, 4, 0, -5), (.08, 2, 4, -1), (.2, 1.5, 6.5, -2.5), (.32, 1, 2.5, -1), (.43, -1.5, 1, -1),
               (.55, 5.5, 5.5, 1), (.68, 1.5, 3.5, -1), (.8, 1, 4.5, -0.5), (.93, 1.5, 0.5, -4.5),
               (1, 1.5, 1.5, -1.5)]
# Side panel under the hand's push. Each row: pitch in Hz, width in Hz, relative level in dB.
SIDE_PANEL = [(113, 65, 5.5), (141.9, 14.7, -4.5)]
# Single leans of the hand or foot that make the side panel boom. Each row: start in seconds, level in dB.
PANEL_LEANS = [(0, -38.5), (.52, -55), (.96, -48), (1.87, -51), (2.055, -34.5), (2.13, -40.5), (2.61, -46),
               (2.81, -47), (6.0, -47), (6.31, -41.5), (6.452, -44.5)]
PUSH_RISE_S, PUSH_T60_S = 0.0034, 0.34
SHAKE_DB, SHAKE_UPPER_DB, SHAKE_T60_S = -22.5, -30, 0.14  # buzz after a thud, against the thud's level
CHATTER_DB = -22  # against the upper part of the grind


def winding():
    """The gears grind by the stroke of each turn; thuds shake the panels; pushes make the side panel boom."""
    starts = [row[0] for row in CRANK_TURNS] + [LAST_TURN_END_S]
    share = np.interp(np.arange(N) / SR, starts, np.arange(len(starts))) % 1
    at, *stroke = np.transpose(TURN_STROKE)
    grind_db, upper_db, boom_db = [level + np.interp(share, at, offset)
                                   for level, offset in zip(curves(PANEL_MURMUR), stroke)]
    lower = teeth([(100, -16.5), (220, -0.5), (300, -2.0), (420, 1.5), (600, -2.0), (800, -21.0), (1200, -41.5)])
    upper = teeth([(400, -39), (650, -13), (800, 4.5), (1000, -4.5),
                   (1200, -2), (1400, -15), (1700, -18), (2500, -19.5)])
    shake = dying([row[:2] for row in WOOD_THUDS], 0.019, SHAKE_T60_S)
    grind = (amp(grind_db) + amp(SHAKE_DB) * shake) * lower
    grind += (amp(upper_db) + amp(SHAKE_UPPER_DB) * shake) * upper
    grind += amp(upper_db + CHATTER_DB) * swell(starts[0], starts[-1], 0.054) * chatter()
    push = rng.standard_normal(N)
    boom = sum(amp(db) * evened(resonate(resonate(push, hz, w), hz, w)) for hz, w, db in SIDE_PANEL)
    pushes = dying([(row[0], row[4]) for row in CRANK_TURNS] + PANEL_LEANS, PUSH_RISE_S, PUSH_T60_S)
    return grind + evened(boom) * (amp(boom_db) + pushes) + throb()


def scene():
    """Air, hum and cloth under the metal, the creaks, the hits with their room tail, and the winding."""
    background = air() + hum() + cloth() + door_metal() + creaks()
    high, low = ticks(), thuds()
    wet = amp(-15.0) * room(low[0]) + amp(-9.5) * room(high.mean(0))
    return background + high + low + wet + winding()


# Colour of the microphone ports. Each row: frequency in Hz, gain in dB.
PORT_COLOUR = [(25, -16.5), (45, 2), (100, -1), (5500, 4.5), (7000, 10), (8000, 5.5), (8900, -2.5),
               (9700, 5.5), (10500, 4), (12400, -2), (14000, 2.5), (15800, 0), (16200, -34)]
# Mismatch of the two ports. Each row: frequency in Hz, left-right difference in dB.
PORT_MISMATCH = [(200, 1), (380, -0.5), (700, -3), (1290, 0.5), (2380, -1), (4400, -2), (7500, -7),
                 (10500, 14), (15000, -3)]
EDGE_HZ = 16450


def record(dry):
    """Port colour, a little different left and right, then the band limit."""
    ports = []
    for x, side in zip(dry, (.5, -.5)):
        mismatch = [(hz, side * db) for hz, db in PORT_MISMATCH]
        ports.append(colour(colour(x, PORT_COLOUR), mismatch))
    lowpass = signal.firwin(511, EDGE_HZ, window=("kaiser", 9), fs=SR)
    return signal.oaconvolve(np.array(ports), lowpass[None], "same")


dry = scene()
out = record(dry)
waveform_to_disk(out)
```